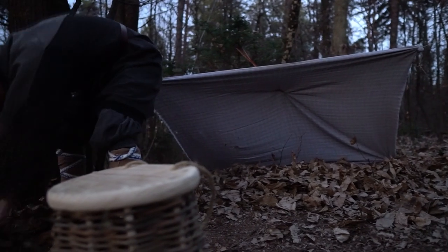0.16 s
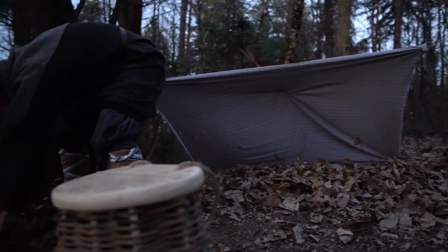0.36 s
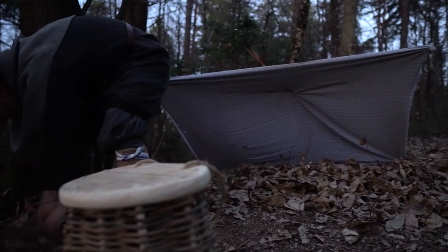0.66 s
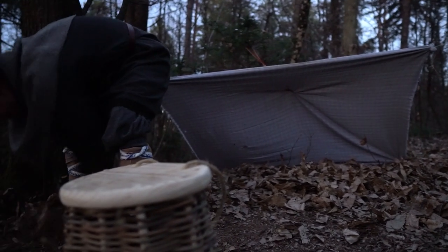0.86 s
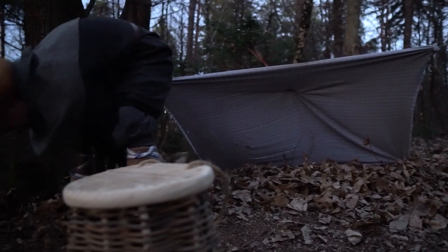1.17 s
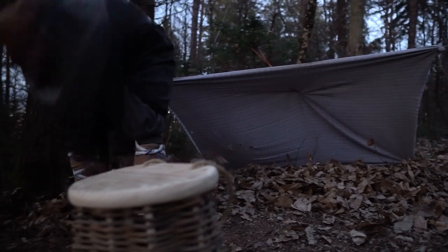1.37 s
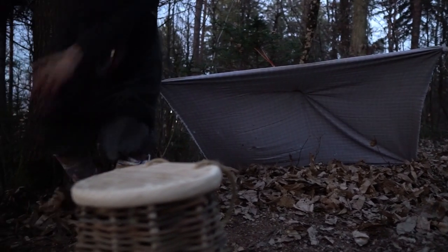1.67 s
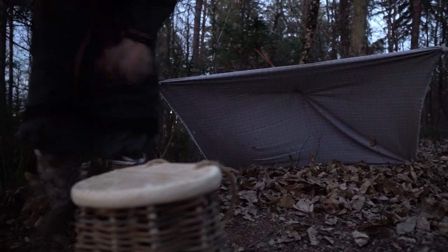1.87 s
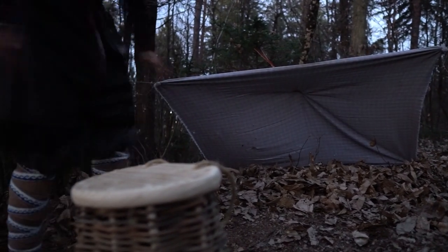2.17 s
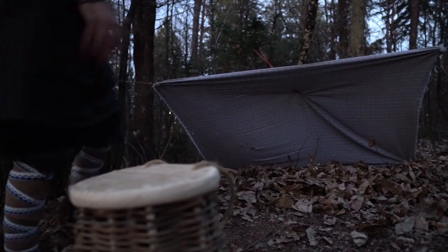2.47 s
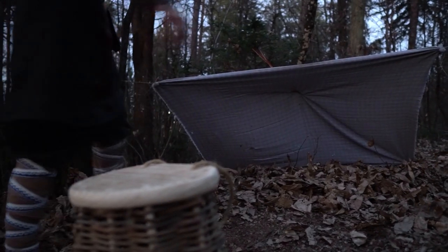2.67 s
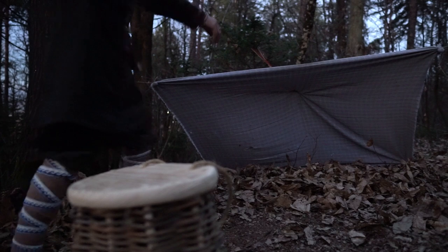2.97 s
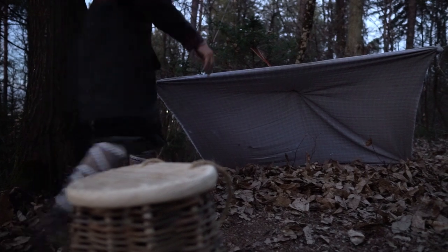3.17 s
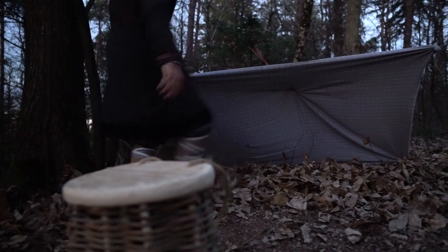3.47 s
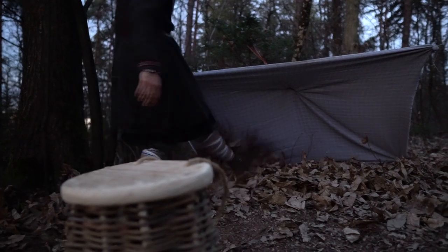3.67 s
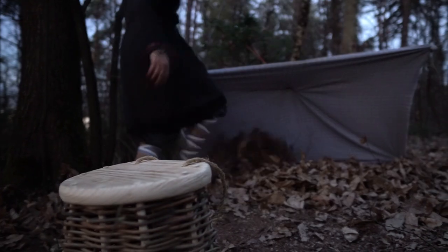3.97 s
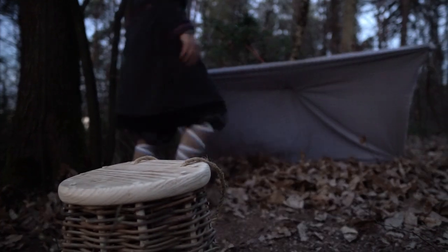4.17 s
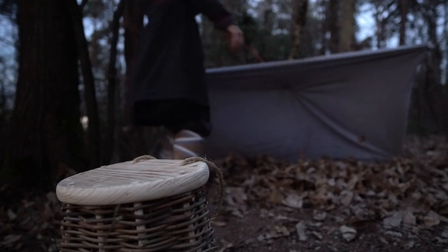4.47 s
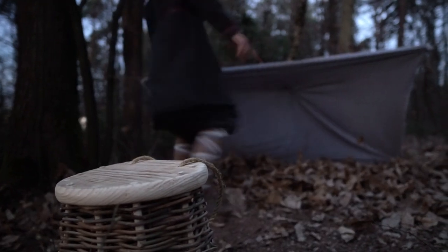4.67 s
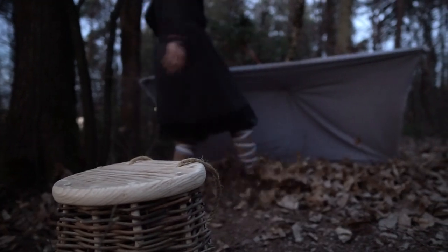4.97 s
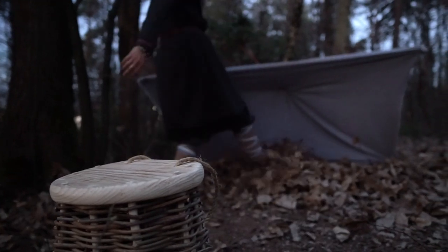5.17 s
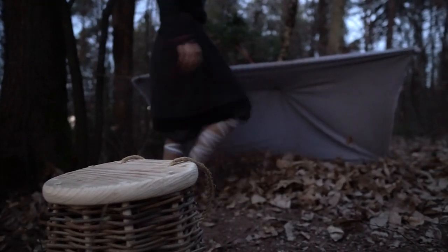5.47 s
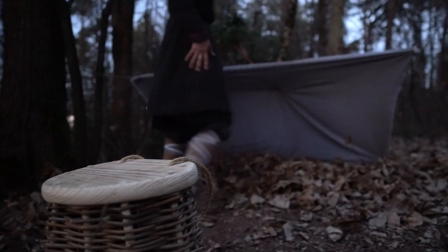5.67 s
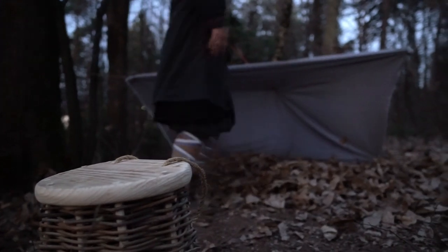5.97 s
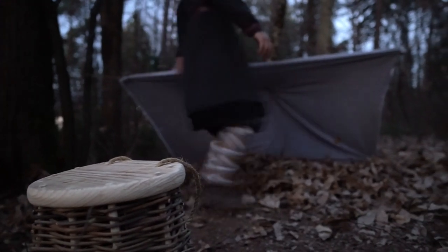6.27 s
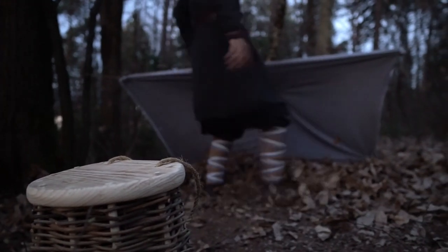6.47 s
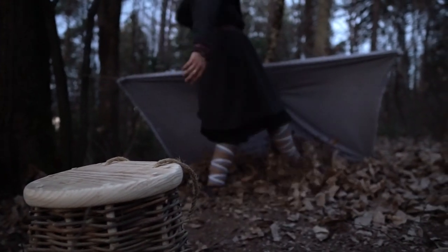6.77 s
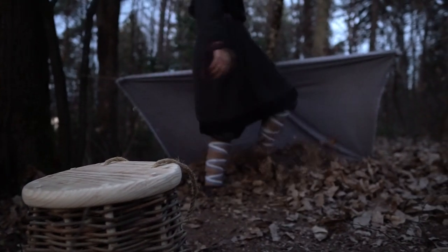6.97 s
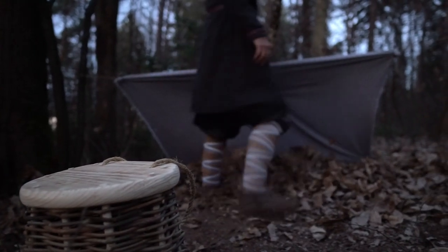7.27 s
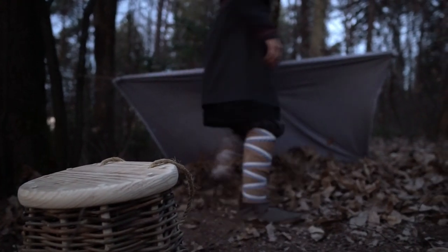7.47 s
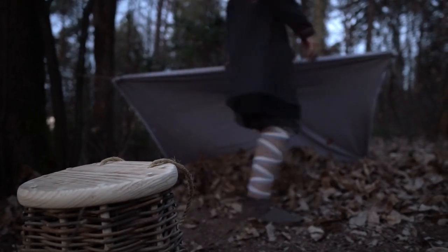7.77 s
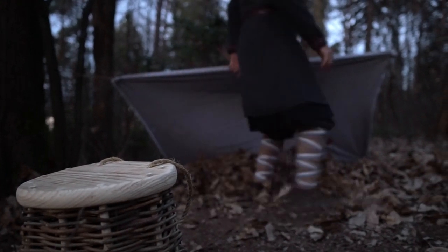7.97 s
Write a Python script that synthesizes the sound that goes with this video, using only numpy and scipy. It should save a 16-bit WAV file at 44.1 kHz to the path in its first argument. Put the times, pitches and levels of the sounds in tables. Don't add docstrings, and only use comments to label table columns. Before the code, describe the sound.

Feet and a hand rustle dry fallen leaves close by, stalks snapping, then kicks and steps crunch through the litter over faint distant rumble.

```python
import sys
import numpy as np
from scipy import signal
from scipy.fft import rfft, irfft, next_fast_len
from scipy.io import wavfile
from scipy.ndimage import uniform_filter1d, map_coordinates

SR = 44100
rng = np.random.default_rng(int(sys.argv[2]) if len(sys.argv) > 2 else 0)


def int16_out(signal):
    q = np.round(np.clip(np.atleast_2d(signal).T, -1, 1) * 32767)
    wavfile.write(sys.argv[1], SR, q.astype(np.int16))


def invert_db(x):
    u = np.asarray(x, float) / 20
    return 10 ** u


N = 357651

# time in seconds, bearing from 1 = left through 0 = ahead to -1 = right.
BEARING = [(0, -0.075), (.2, 0.82), (1.05, 0.94), (1.15, 0.047), (1.7, 0.95), (2.65, 1), (2.78, 0.21),
           (3.02, 0.41), (3.07, 1), (3.3, 0.46), (3.6, 0.055), (4.42, 0.22), (5.6, -0.064), (5.8, 0.17),
           (6.3, 0.0025), (6.4, -0.41), (6.9, -0.28), (7.0, 0.07), (7.8, -0.45), (7.95, -0.67)]


def unit(x):
    return x / np.sqrt(np.mean(x ** 2) + 1e-20)


def along(points, hz):
    f, v = np.transpose(points)
    return np.interp(np.log(hz + 1), np.log(f + 1), v)


def curves(rows):
    s, *cols = np.transpose(rows)
    return [np.interp(np.arange(N) / SR, s, c) for c in cols]


def wobble(rate):
    return map_coordinates(rng.standard_normal(N // 64), [np.arange(N) * rate / SR])


def filtered(x, response):
    m = next_fast_len(N + 8192)
    return irfft(rfft(x, m) * response(np.fft.rfftfreq(m, 1 / SR)), m)[..., :N]


def pair(alike):
    turn = lambda hz: np.arccos(np.clip(along(alike, hz), -1, 1)) / 2
    weights = lambda hz: np.array([np.cos(turn(hz)), np.sin(turn(hz))])
    mid, side = filtered(rng.standard_normal((2, N)), weights)
    return np.array([mid + side, mid - side])


def strokes():
    # peak time in seconds, crush level in dB,
    # rise in seconds, fall in seconds, crispness in dB re crush.
    rakes = [(-0.01, -50, 0.78, 0.48, -0.5), (0.342, -46.5, 0.02, 0.04, 10), (0.435, -47.5, 0.2, 0.049, 9),
             (0.588, -40, 0.25, 0.076, 2.5), (0.703, -41, 0.62, 0.19, 4.5), (0.828, -35.0, 0.36, 0.26, -2),
             (1.105, -35.5, 0.22, 0.2, -5.5), (1.46, -45.5, 0.71, 0.63, -6.5), (1.713, -44, 0.28, 0.13, -2),
             (1.812, -52.5, 0.11, 0.028, 8.5), (1.858, -60, .012, 0.026, 11.5), (1.8, -54.5, 0.32, 0.97, 2),
             (2.036, -43.5, 0.024, 0.13, 9.5), (2.19, -52, 0.08, 0.99, -19),
             (2.438, -41.5, 0.018, 0.14, -11), (2.418, -43.5, 0.13, 0.15, 0.5),
             (2.636, -56, 0.32, 0.15, 8.5), (2.816, -33, 0.29, 0.23, -16), (2.938, -33, 0.092, 0.2, -19),
             (3.085, -53, 0.062, 0.023, 7), (3.251, -47.5, 0.3, 0.043, -9)]
    # peak time in seconds, crush level in dB,
    # rise in seconds, fall in seconds, crispness in dB re crush.
    kicks = [(3.43, -25.5, 0.072, 0.46, -6), (3.616, -31, 0.13, 0.29, 1), (3.858, -39.5, 0.094, 0.36, 3),
             (4.179, -41, 0.49, 0.081, -2.5), (4.347, -41.5, 0.26, 0.052, 1), (4.51, -36.5, 0.14, 0.34, -9),
             (4.576, -42.5, 0.17, 0.1, 7.5), (4.861, -36, 0.18, 0.59, 5.5),
             (5.021, -31.5, 0.17, 0.25, -2.5), (5.303, -41.5, 0.22, 0.083, 3),
             (5.398, -47.5, 0.41, 0.2, 3.5), (5.757, -47, 0.061, 0.12, 0), (5.797, -50.5, .06, .022, -1),
             (5.962, -48.5, 0.15, 0.32, 1), (6.06, -46, 0.15, 0.11, 7.5), (6.115, -43, 0.068, 0.06, 6),
             (6.155, -40.5, 0.13, 0.034, 3), (6.2, -48.5, 0.066, 0.11, 4), (6.461, -39.5, 0.05, 0.4, 8),
             (6.63, -28.5, 0.2, 0.22, -2), (6.715, -35.5, 0.063, 0.064, 1), (6.79, -41.5, 0.15, 0.34, 1),
             (6.975, -49, 0.043, 0.024, 7), (7.046, -41.5, 0.18, 0.15, 5.5), (7.105, -42, 0.084, 0.031, 1),
             (7.15, -52, 0.068, 0.17, 7.5), (7.275, -53.5, .6, 0.068, 5), (7.408, -49, 0.062, 0.052, 7.5),
             (7.584, -58.5, .14, 0.065, 19), (7.703, -39.5, 0.2, 0.083, 5.5), (7.782, -47, 0.03, 0.12, 2),
             (7.951, -43.5, 0.02, .6, 1), (8.101, -35, 0.18, .5, 1.5)]
    # time in seconds, crush level in dB, fall in seconds,
    # crispness in dB re crush.
    touches = [(1.99, -47, 0.11, 8.5), (3.36, -38, 0.091, 0), (5.689, -51.5, 0.11, 2),
               (6.402, -58, 0.13, 11), (4.452, -41.5, 0.11, -11), (8.056, -53, .15, -4)]
    touch_rise_s = .004
    swing_db, roundness = 20, 1.5

    abrupt = [(s, db, touch_rise_s, *rest) for s, db, *rest in touches]
    s, db, rise, fall, crisp = np.transpose(rakes + kicks + abrupt)[:, :, None]
    t = np.arange(0, N / SR + .004, .002)
    away = np.where(t < s, (s - t) / abs(rise), (t - s) / abs(fall))
    power = invert_db(2 * (db - swing_db * away ** roundness)) + 1e-12
    crush = 10 * np.log10(power.sum(0))
    bright = 10 * np.log10((power * invert_db(2 * crisp)).sum(0))
    return curves(np.c_[t, crush, bright - crush])


def cracks(count, centre_hz, octaves, cycles, scatter_db, spread_ms):
    u, g = rng.random((count, 2)), rng.standard_normal((count, 3))
    start = (u[:, :1] * N).astype(int)
    hz = np.clip(centre_hz * 2 ** (octaves * g[:, :1]), 1500, 15500)
    size = invert_db(-scatter_db * np.log(u[:, 1:] + .018))
    out = []
    for side in (1, -1):
        lag_s = 2e-4 + side * spread_ms / 2000 * g[:, 1:2]
        t = np.maximum(np.arange(60) / SR - lag_s, 0)
        ring = np.sin(2 * np.pi * hz * t) * np.exp(-t * hz / cycles)
        grain = size * invert_db(side * 0.5 * g[:, 2:]) * ring
        out.append(np.bincount((start + np.arange(60)).ravel(), grain.ravel(), N + 60)[:N])
    return unit(np.array(out))


def patchy(x, depth_db):
    z = signal.stft(x, nperseg=512)[2]
    field = uniform_filter1d(rng.standard_normal(z.shape[1:]), size=9, axis=0)
    field = uniform_filter1d(field, size=12, axis=1)
    return signal.istft(z * invert_db(depth_db * unit(field)), nperseg=512)[1][:, :N]


def ports(place):
    # frequency in Hz, level in dB per Hz.
    litter = [
        [(88, -40), (150, -6.5), (381, -2), (436, -7.5), (530, -2.5), (643, -6.5), (812, -2), (930, -6.5),
         (1150, 4), (2020, -1.5), (2600, 3.5), (3220, 3), (4750, -1), (6470, -2), (15500, -6)],
        [(88, -37), (150, -10.5), (366, -3.5), (420, -11), (462, -4), (595, -7.5), (668, -1.5), (860, -7),
         (1700, -3.5), (1940, -4), (2810, 0), (4480, -4.5), (4930, -4), (9540, -7), (15500, -13.5)],
        [(88, -41), (150, -7), (244, 3.5), (519, -3), (708, 7), (948, -3.5), (1660, -1.5), (2310, -4.5),
         (2760, -0.5), (3620, 0), (6860, -3.5), (7410, -3.5), (8170, -6), (8830, -3), (15500, -3.5)],
    ]
    # frequency in Hz, left-right difference in dB.
    shading = [
        [(300, 1), (1300, 2), (2100, 1), (2900, -2.5), (3300, -1.5), (4200, 0), (6000, 3), (9000, 4),
         (15500, 9.5)],
        [(300, 1), (1300, -0.5), (2800, -5.5), (4000, -0.5), (9000, -2.5), (13000, -1), (15500, 3)],
        [(300, -1), (1100, -5), (2800, -6), (4000, -11), (9000, -3), (12000, 5), (15500, 6)],
    ]
    # delay in ms, gain, phase turn in cycles.
    routes = [
        ([(0, 1, 0), (.034, .7, .657), (.855, .182, .092)], [(.061, 1, -.045), (.064, 1.028, .477), (.255, .104, .4), (.856, .243, .856), (.87, .232, .342)]),
        ([(0, 1, 0), (.885, .3, .5)], [(0, 1, 0), (.32, .14, 0), (.885, .22, .5)]),
        ([(.022, 1, 0), (.68, .14, 0), (.87, .25, .5)], [(0, 1, 0), (.31, .12, 0), (.66, .17, 0), (.87, .18, .5)]),
    ]

    delay = lambda hz, ms, gain, turn: gain * np.exp(-2j * np.pi * (hz * ms / 1000 - turn))
    direct = lambda hz, ms, gain, turn: delay(hz, ms, gain, turn * np.minimum(hz / 1300, 1))
    dull = lambda hz: 1 / (1 + (hz / 10500) ** 4) * hz ** 4 / (hz ** 4 + 1000 ** 4)
    paths = lambda hz, rows: direct(hz, *rows[0]) + dull(hz) * sum(delay(hz, *r) for r in rows[1:])
    ripple = lambda hz, h: h / np.sqrt(uniform_filter1d(abs(h) ** 2, size=round(1150 / hz[1])))
    tilt = lambda hz: np.outer([.5, -.5], along(shading[place], hz))
    colour = lambda hz: invert_db(along(litter[place], hz) + tilt(hz))
    return lambda hz: colour(hz) * [ripple(hz, paths(hz, rows)) for rows in routes[place]]


def placed(x):
    b = np.clip(curves(BEARING)[0], -1, 1)
    shares = [np.maximum(b, 0), 1 - abs(b), np.maximum(-b, 0)]
    return sum(filtered(share * x, ports(place)) for place, share in enumerate(shares))


def leaves():
    # time in seconds, level in dB re crush.
    load = [(.3, -13.5), (.55, -10), (.85, -9.5), (1.2, -12), (1.95, -10.5), (2.05, -4), (2.3, -4.5),
            (2.75, -14), (3.2, -5.5), (3.45, -10), (3.95, -12.5), (4.6, -6), (5.05, -7.5), (5.3, -12),
            (5.75, -3), (6.05, -14), (6.2, -6.5), (6.45, -11.5), (6.62, -12), (7.0, -17.5), (7.3, -3),
            (7.6, -9), (8.1, -10.5)]
    # frequency in Hz, coherence from 0 to 1.
    likeness = [(200, 1), (700, 0.93), (1400, 0.97), (3000, 0.96), (7000, 0.95), (15000, 0.6)]

    crush_db, crisp_db = strokes()
    weight_db = curves(load)[0]
    fine = cracks(count=27000, centre_hz=6610, octaves=0.97, cycles=3.9, scatter_db=4.0, spread_ms=0.066)
    thin = [(300, -16), (1500, -9), (3500, -3), (6000, 0), (15000, 6)]
    fine = unit(filtered(fine, lambda hz: invert_db(along(thin, hz))))
    clumps = invert_db(0.72 * wobble(35) + 0.62 * wobble(140))
    rubbing = pair(likeness)
    rush = placed(clumps * patchy(rubbing + invert_db(-6.0) * fine, depth_db=1.3))

    low = lambda hz: along([(900, 0.91), (2100, 0.017)], hz)
    high = lambda hz: along([(4500, 0.024), (9000, 0.63)], hz)
    middle = lambda hz: 1 - low(hz) - high(hz)
    weight = unit(filtered(rush, low)) * invert_db(weight_db - 3.0 + 0.58 * wobble(25))
    crisp = unit(filtered(rush, high)) * invert_db(crisp_db - 0.5)
    body = unit(filtered(rush, middle)) * invert_db(-0.47)
    return invert_db(crush_db + 2.0) * (weight + body + crisp)


def forest():
    # time in seconds, level in dB.
    swell = [(0, -57.5), (.4, -59), (1.0, -52.5), (1.3, -57), (1.65, -53), (2.2, -52), (2.4, -52.5),
             (3.0, -54.5), (3.7, -51), (4.1, -54), (5.0, -57.5), (6.0, -55.5), (6.6, -55.5), (7.3, -57),
             (8.11, -59.5)]
    # frequency in Hz, level in dB per Hz.
    rumble_colour = [(12, -44), (20, -9.5), (54, -3.5), (70, 2), (82, -4.5), (134, -5), (150, -4),
                     (168, -44), (208, -11), (400, -34), (520, -17), (880, -120)]
    # frequency in Hz, level in dB per Hz.
    hiss_colour = [(88, -38), (150, 3.5), (428, -4), (1540, -0.5), (2060, -3.5), (2760, 3), (3350, -0.5),
                   (6110, -1), (15500, -1.5)]

    rumble = filtered(pair([(30, 1.0), (300, 1.0)]), lambda hz: invert_db(along(rumble_colour, hz)))
    rumble = unit(invert_db(2.0 * wobble(5.7)) * rumble)
    hiss = pair([(300, 0.9), (3000, 0.21), (12000, 0.084)])
    hiss = unit(filtered(hiss, lambda hz: invert_db(along(hiss_colour, hz))))
    return invert_db(curves(swell)[0]) * rumble + invert_db(-50.0) * hiss


def stalks():
    # time in seconds, peak level in dB, pitch in Hz.
    snaps = [(0.2345, -31, 14000), (0.3262, -24, 13300), (0.3364, -22, 12700), (0.3428, -18, 13200),
             (0.4075, -22, 12400), (0.417, -10, 11000), (0.4325, -21, 10000), (0.5525, -15, 11000),
             (0.5895, -21, 4260), (0.8012, -17, 5580), (1.178, -23, 6000), (1.4067, -30, 7800),
             (1.4845, -30, 8500), (1.5937, -25, 8400), (1.6235, -21, 9500), (1.6374, -29, 8800),
             (1.9915, -24, 13000), (2.0205, -21, 11700), (2.041, -16, 14000), (2.0665, -20, 9000),
             (2.1224, -24, 11200), (2.148, -28, 9100), (2.1557, -26, 12200), (2.4423, -25, 2800),
             (2.9629, -23, 2760), (3.0036, -24, 2900), (3.0194, -23, 2760), (3.069, -14, 12100),
             (3.0828, -17, 11400), (3.0852, -22, 10500), (3.0984, -25, 13500), (3.2258, -29, 2900),
             (3.2442, -28, 12000), (3.2647, -27, 9800), (3.3085, -32, 10600), (3.3438, -25, 2800),
             (3.3637, -20, 4000), (3.3739, -17, 3800), (4.2296, -25, 6900), (4.2733, -18, 8800),
             (4.2762, -25, 9400), (4.3158, -8, 11500), (4.3162, -12, 6200), (4.519, -23, 2470),
             (4.8936, -20, 2760), (4.9006, -16, 11400), (5.2864, -20, 7500), (5.5697, -36, 5300),
             (5.6892, -32, 4000), (5.7359, -32, 3270), (5.7591, -30, 3100), (5.7651, -28, 3360),
             (5.8006, -29, 6500), (6.1038, -21, 12700), (6.1664, -25, 9000), (6.2235, -28, 9100),
             (6.3386, -37, 3900), (6.9783, -24, 5500), (7.2992, -35, 3190), (7.7022, -19, 10300)]
    t60_s, full_pan_db = .007, 5.5

    out, t = np.zeros((2, N + 1024)), np.arange(1024) / SR
    f = np.fft.rfftfreq(2048, 1 / SR)
    for s, db, hz in snaps:
        pan_db = full_pan_db * np.interp(s, *np.transpose(BEARING))
        burst = rng.standard_normal(1024) * invert_db(-60 * t / t60_s)
        burst[0] = 3
        width = .45 * hz
        resonance = 1j * f * width / (hz * hz - f * f + 1j * f * width)
        shape = (0.043 + resonance) * f / (f + 0.15 * hz)
        ring = irfft(rfft(burst, 2048) * shape)[:1024]
        ring *= invert_db(db) / abs(ring).max()
        start = round(s * SR)
        lag = round(max(pan_db, 0) * 0.2)
        out[0, start:][:1024] += invert_db(pan_db / 2) * ring
        out[1, start + lag:][:1024 - lag] += invert_db(-pan_db / 2) * ring[:1024 - lag]
    return out[:, :N]


def puffs():
    # middle in seconds, peak level in dB, frequency in Hz.
    gusts = [(1.06, -45.5, 100), (1.438, -43.5, 70), (1.478, -42, 88), (1.515, -48, 64.6), (1.643, -38, 79),
             (1.659, -41.5, 100), (1.7, -47, 80), (1.876, -41.5, 75), (1.906, -48, 80), (1.975, -41, 70),
             (2.095, -42, 62), (2.169, -36.5, 50), (2.256, -36.5, 58.3)]
    out, t = np.zeros(N), np.arange(-4096, 4096) / SR
    for s, db, hz in gusts:
        swing = np.exp(-(t / 0.016) ** 2) * np.cos(2 * np.pi * hz * t)
        out[round(s * SR) - 4096:][:8192] += invert_db(db) * swing
    return out


def soles():
    # time in seconds, peak level in dB, pitch in Hz.
    thuds = [(1.986, -41.5, 214), (2.037, -35, 440), (3.177, -63, 320), (3.221, -39, 240),
             (3.232, -33, 364), (3.243, -36.5, 247), (3.284, -45, 152), (4.122, -43, 270),
             (4.896, -38, 686), (5.386, -44, 239), (5.708, -41, 710), (5.738, -47, 151), (6.058, -45, 690),
             (6.458, -43, 698), (6.599, -35, 213), (7.062, -43, 244), (7.09, -45, 344), (7.111, -40, 362),
             (7.135, -43, 473), (7.179, -37, 595), (7.201, -33.5, 660), (7.222, -46, 304),
             (7.238, -38, 690), (7.25, -49, 493), (7.278, -51, 680), (7.412, -38, 368), (7.96, -36, 740)]
    out, t = np.zeros(N + 2048), np.arange(2048) / SR
    for s, db, hz in thuds:
        knock = np.sin(2 * np.pi * hz * t) + 0.6 * np.sin(2 * np.pi * 1.86 * hz * t)
        decay = invert_db(db + 4.5 - 60 * t * hz / 7.8)
        out[round(s * SR):][:2048] += decay * (1 - np.exp(-t / 0.0014)) * knock
    return out[:N]


def gliding(voices):
    t, out = np.arange(N) / SR, 0
    waver_hz, broken_db = 35 * wobble(120), 4 * wobble(60)
    for rows, pan_db in voices:
        hz, db = curves(rows)
        phase = 2 * np.pi * np.cumsum(hz + waver_hz) / SR
        sounding = (t > rows[0][0]) * (t < rows[-1][0])
        tone = invert_db(db + 3.5 + broken_db) * np.sin(phase) * sounding
        out = out + tone * invert_db([[pan_db / 2], [-pan_db / 2]])
    return out


def bird():
    # rows of time in seconds, pitch in Hz, level in dB; then its left-right difference in dB.
    whistles = [
        ([(4.02, 2030, -74), (4.05, 2000, -60), (4.12, 1990, -59), (4.14, 1980, -75)], -3),
        ([(7.81, 2080, -76), (7.83, 2120, -61), (7.89, 2230, -62), (7.93, 2360, -63), (7.96, 2420, -84)], 5),
    ]
    return gliding(whistles)


def branch():
    # rows of time in seconds, pitch in Hz, level in dB; then its left-right difference in dB.
    groans = [
        ([(7.945, 760, -62), (7.97, 730, -53), (8.0, 690, -54), (8.03, 620, -64)], -2),
    ]
    return gliding(groans)


def scene():
    return leaves() + forest() + stalks() + puffs() + soles() + bird() + branch()


def top_cut(x):
    return signal.sosfilt(signal.butter(12, 17070, fs=SR, output="sos"), x)


def record(dry):
    # frequency in Hz, lead in radians.
    lead = [(20, .26), (400, .22), (1300, .18), (2200, 0)]
    capsules = lambda hz: np.exp(1j * np.outer([.5, -.5], along(lead, hz))) * (hz < 15760)
    return top_cut(filtered(dry, capsules))


dry = scene()
out = record(dry)
int16_out(out)
```